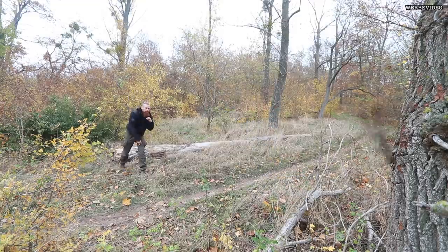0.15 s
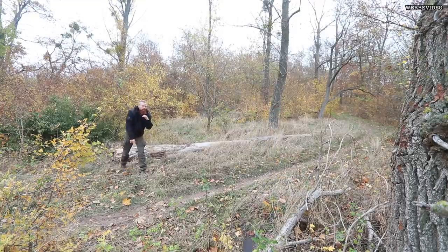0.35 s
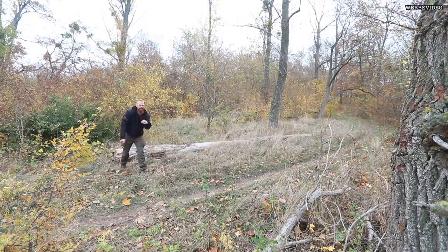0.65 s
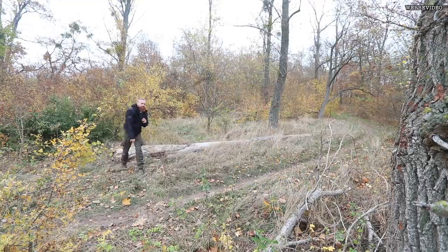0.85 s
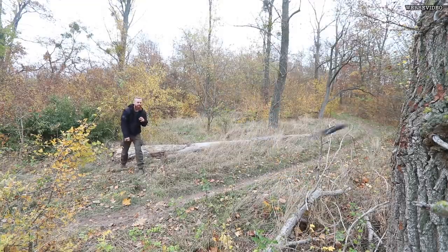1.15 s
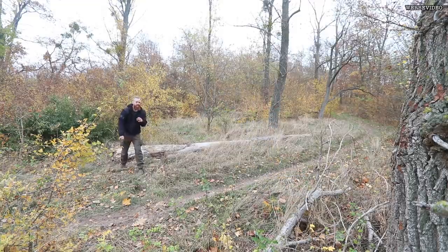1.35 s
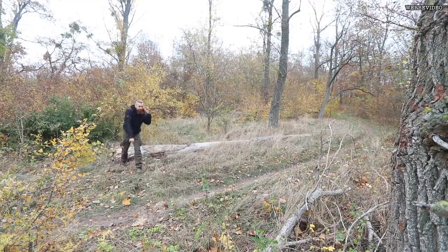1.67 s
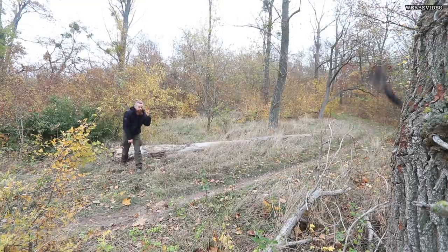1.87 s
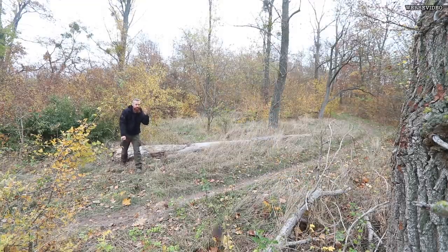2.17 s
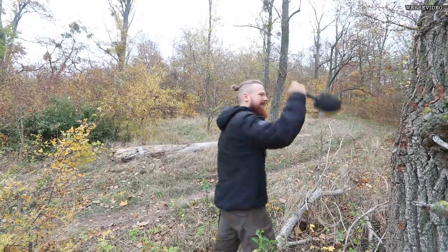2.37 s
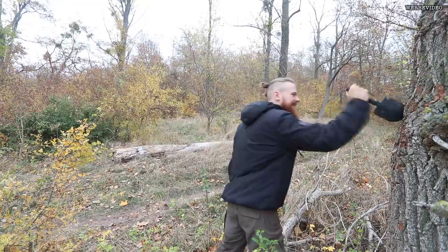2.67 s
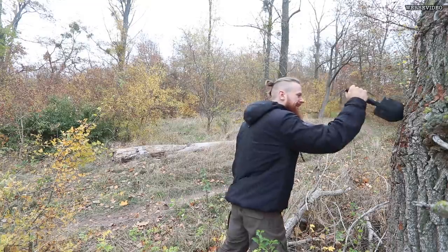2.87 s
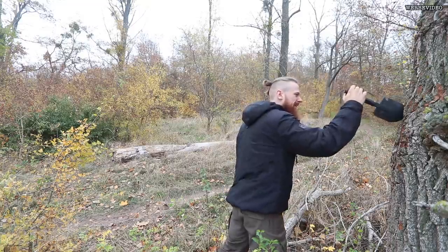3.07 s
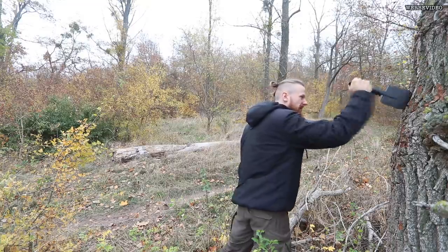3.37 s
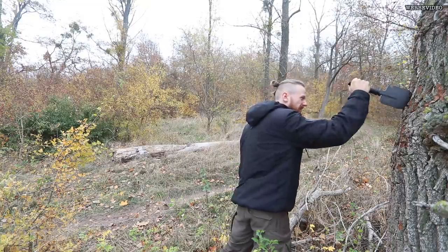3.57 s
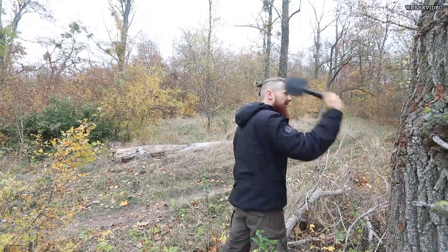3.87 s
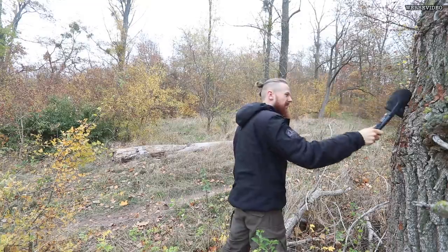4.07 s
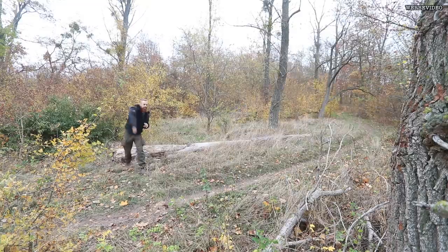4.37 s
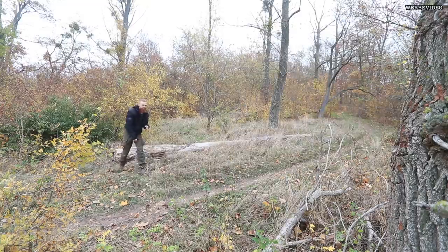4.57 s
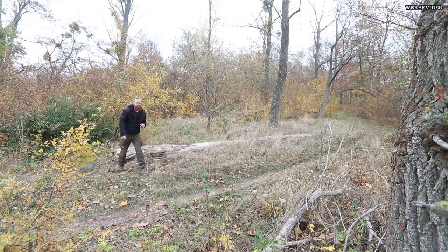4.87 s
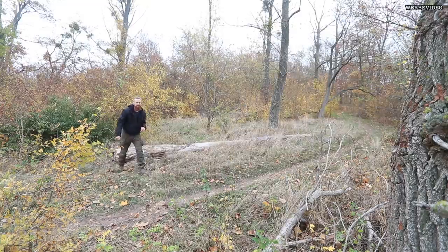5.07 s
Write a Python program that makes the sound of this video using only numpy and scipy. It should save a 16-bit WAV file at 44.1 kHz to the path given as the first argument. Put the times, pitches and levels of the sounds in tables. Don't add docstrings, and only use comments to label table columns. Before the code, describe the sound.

A quiet forest with a dull, faint hush and soft breeze, heard close to a tree in stereo. From the start, pulsing puffs of air with a thin whistle rush nearer, and at 0.2 s a steel shovel slams into the trunk: sharp crack, woody thud, rattling bounces, clear metallic ring and a diffuse echo. It drops into crunchy dry leaves around 0.55 s. A second whir ends in a heavier, thudding hit at 1.06 s, with tiny bark ticks near 1.4 s. A third, whistling throw strikes at 1.9 s and lands in leaves at 2.35 s. Hand-held chops follow at 2.73, 3.43 and 4.06 s, tighter, with short rattles and soft swings before them. Another fluttering, whistling throw hits hard at 4.67 s. A last knock at 5.02 s sets off a loud leaf burst and a small tumble. Takes cut abruptly; the strongest hits distort slightly.

```python
import sys
import numpy as np
from scipy import signal
from scipy.fft import rfft, irfft
from scipy.io import wavfile
from scipy.ndimage import uniform_filter1d

SR = 44100
rng = np.random.default_rng(int(sys.argv[2]) if len(sys.argv) > 2 else 0)


def transcribe(signal):
    frames = np.atleast_2d(signal).T
    limited = np.clip(frames, -1, 1)
    pcm = np.round(limited * 32767).astype(np.int16)
    wavfile.write(sys.argv[1], SR, pcm)


def to_linear_factor(level_db):
    exponent = np.asarray(level_db, float) / 20
    return 10 ** exponent


N = 230598


def evened(x):
    return x / np.sqrt(np.mean(x ** 2) + 1e-20)


def read(points, hz):
    f, value = np.transpose(points)
    return np.interp(np.log(hz + 1), np.log(f + 1), value)


def add(mix, s, sound):
    part = mix[..., round(s * SR):][..., :sound.shape[-1]]
    part += sound[..., :part.shape[-1]]


def pair(source, tone, same):
    hz = np.fft.rfftfreq(source.shape[-1], 1 / SR)
    a, b = rfft(source)
    likeness = np.clip(read(same, hz), 0, 1)
    shared = np.sqrt((1 + likeness) / 2) * a
    own = np.sqrt((1 - likeness) / 2) * b
    ports = np.array([shared + own, shared - own]) * to_linear_factor(read(tone, hz))
    return evened(irfft(ports, source.shape[-1]))


def noise(length):
    return rng.standard_normal((2, length))


# pitch_hz, likeness
SAME = [(60, 0.21), (180, 0.7), (550, 0.78), (1650, 0.28), (4970, 0.49), (15000, 0.09)]
# pitch_hz, level_db (per Hz)
QUIET = [(12, -49), (25, -6), (70, -4.5), (596, -3), (811, -1), (1250, -7.5), (4490, -22), (16300, -26.5)]


def hush():
    return to_linear_factor(-60.5) * pair(noise(N), QUIET, SAME) * to_linear_factor([[-1.1], [1.1]])


# pitch_hz, level_db
HISS = [(800, -32), (2000, -3), (4000, -2.5), (8000, -4), (12000, -11), (16400, -14.5)]


def breeze():
    return pair(noise(N), HISS, SAME)


# first_puff_s, nearest_puff_s, flutter_db, hiss_db
FLIGHTS = [
    (.004, 0.128, -47, -54),
    (0.839, 0.976, -49, -53),
    (1.536, 1.82, -49.5, -57),
    (4.399, 4.593, -47.5, -51),
]
# centre_s, flutter_db, hiss_db, length_s
SWINGS = [
    (2.481, -60, -60.5, 0.33),
    (2.711, -62, -58.5, .065),
    (3.396, -71, -62.5, 0.078),
    (4.045, -73, -63, 0.046),
    (5.013, -46, -75, 0.027),
]


def puffs():
    half_turn_s, puff_s = .068, .056
    rows = list(SWINGS)
    for first, near, flutter_db, hiss_db in FLIGHTS:
        turns = round((near - first) / half_turn_s)
        for k in range(turns + 1):
            rows.append((near - k * (near - first) / turns, flutter_db - 2.5 * k, hiss_db - 2 * k, puff_s))
        rows.append((near + .055, flutter_db + .5, hiss_db - 8.5, puff_s))
    return rows


def whir():
    low = [(60, -20.5), (200, -4.5), (450, 0.45), (850, -1.0), (1500, -5.5), (2500, -10.0), (5000, -36)]
    power = np.zeros((2, N))
    for s, flutter_db, hiss_db, length in puffs():
        start = max(s - 1.2 * length, 0)
        t = np.arange(start, s + 1.2 * length, 1 / SR)
        swell = np.exp(-8 * ((t - s) / length) ** 2)
        add(power, start, to_linear_factor([[2 * flutter_db], [2 * hiss_db]]) * swell)
    flutter, hiss = np.sqrt(power)
    return flutter * pair(noise(N), low, SAME) + hiss * pair(noise(N), HISS, SAME)


# time_s, pitch_hz, level_db
WHISTLES = [(0.117, 1974, -50), (0.154, 1880, -42), (.14, 833, -48.5), (1.583, 796, -55.5),
            (1.679, 865, -53.5), (1.693, 1930, -50), (1.769, 835, -52), (1.832, 1850, -45.5),
            (1.85, 833, -42.5), (4.469, 1925, -49), (4.53, 873, -51.5), (4.604, 1880, -52),
            (4.65, 890, -45)]


def whistles():
    out = np.zeros((2, N))
    for s, hz, db in WHISTLES:
        length = 58 / hz
        bump = np.hanning(round(0.9 * length * SR))
        wobble = uniform_filter1d(rng.standard_normal(8000), size=300)
        turns = np.cumsum(hz * (1 + 0.19 * wobble))[:len(bump)] / SR
        tone = bump[:len(turns)] * np.sin(2 * np.pi * turns)
        add(out, s - 0.35 * length, to_linear_factor(db) * tone[None])
    return out


def held(s):
    return 2.401 <= s < 4.389


RATTLE_T60 = 0.043
# time_s, bite_db, bite_hz, body_db, body_hz
STRIKES = [
    (0.2025, 7, 1241, 2.5, 431),
    (1.061, 7, 853, 8, 529.6),
    (1.9114, 6.5, 597, 1.5, 1049),
    (2.7341, -6.5, 1504, -5, 314.3),
    (3.4343, -0.5, 2597, -10.5, 492),
    (4.0596, -1, 1086, 1.5, 384.2),
    (4.6746, 7.5, 1117, 0.5, 611),
    (5.0193, 1, 1600, -10, 435),
]
# time_s, thud_db, thud_hz, crack_db
REBOUNDS = [(0.2088, -7.5, 1925, -3), (.218, -2.5, 801.4, -2.5), (0.2217, -10.5, 1394, -7.5),
            (1.0718, 1, 1906, -5), (1.073, 5.5, 458.2, -8), (1.0795, -7, 629, -18.5),
            (1.918, -5.5, 4958, -3), (1.9333, -9.5, 4900, -16), (1.953, 1, 399.8, -18),
            (1.957, -13.5, 4960, -12.5), (2.7429, -7, 289, -10), (2.742, -8, 2210, -49),
            (2.782, -27.5, 477, -39), (3.4325, -10, 597, -19.5), (3.452, -20, 360, -39.5),
            (4.062, -2, 847, -7.5), (4.071, -22.5, 444, -26.5), (4.122, -45, 1835, -39),
            (4.6837, -0.5, 885, -8), (4.736, -28, 877, -34), (5.021, 2.5, 2284, -8.5), (5.04, -4, 883, -13),
            (5.0748, -25, 710, -21.5)]
# time_s, thud_db, thud_hz, crack_db
LANDINGS = [
    (.524, -51, 2500, -44),
    (0.5347, -41.5, 1210, -36),
    (0.5571, -21.5, 1630, -22.5),
    (0.5641, -31.5, 407, -30),
    (0.5816, -31, 531, -16.5),
    (2.3296, -50.5, 1000, -30.5),
    (2.34, -19, 320, -24.5),
    (2.355, -20, 1594, -18.5),
    (5.1412, -50, 1420, -26.5),
]
# time_s, level_db, pitch_hz
BITS = [
    (0.726, -42, 4070),
    (1.361, -44.5, 8940),
    (1.39, -44.5, 8530),
    (1.4034, -36, 2030),
    (1.4305, -32, 6500),
    (2.277, -53, 7490),
    (2.283, -59.5, 6050),
    (2.3015, -49.5, 9010),
    (5.196, -47, 2424),
]


def touches():
    bite_t60, ground_t60, bit_t60 = 0.019, 0.032, .011
    rows = []
    for s, bite_db, bite_hz, body_db, body_hz in STRIKES:
        rows.append((s, bite_db, bite_hz, bite_db - 4.5, bite_t60))
        rows.append((s + .0035, body_db, body_hz, bite_db - 13.5, RATTLE_T60))
    rows += [(s, db - 6, hz, db, bit_t60) for s, db, hz in BITS]
    rows += [(*row, RATTLE_T60) for row in REBOUNDS]
    return rows + [(*row, ground_t60) for row in LANDINGS]


# pitch_hz, likeness
NEAR_SAME = [(500, .99), (2000, .97), (6000, .9), (15000, .84)]
# pitch_hz, level_db (per Hz)
CRACK = [(100, -41.5), (400, -12), (1000, 0), (2000, 3.5), (3800, -2.5), (8500, -3.5), (11000, -12),
         (16400, -12)]


def contacts():
    t, thuds, cracks, blows = np.arange(6000) / SR, np.zeros(N), np.zeros(N), np.zeros(N)
    for s, thud_db, hz, crack_db, crack_t60 in touches():
        thud_t60 = 0.018 * (1000 / hz) ** 0.8
        if held(s) and crack_t60 == RATTLE_T60:
            crack_db, crack_t60 = crack_db - 4, crack_t60 * 0.58
        turns = hz * t + .4 * (1 - np.exp(-t * hz / 0.5))
        wood = np.sin(2 * np.pi * turns) + to_linear_factor(-3 - 980 * t) * np.sin(2 * np.pi * .57 * turns)
        swell = 1 - np.exp(-(t * hz / 0.48) ** 2)
        push = to_linear_factor(thud_db + 1.5 - 60 * t / thud_t60) * swell
        snap = to_linear_factor(crack_db - 60 * t / crack_t60) * (1 - np.exp(-t / 0.00018))
        add(thuds, s, -push * wood)
        add(cracks, s, snap)
        blows[round(s * SR)] = np.linalg.norm(0.83 * push + snap)
    lumps = to_linear_factor(3.0 * evened(uniform_filter1d(rng.standard_normal(N), size=40)))
    return thuds + cracks * pair(lumps * noise(N), CRACK, NEAR_SAME), blows


# start_s, bending_db, middle_db, edge_db, t60_factor
RINGS = [(.216, -16, -60, -60, .45), (.216, -33, -34, -60, 2.1), (.21, -50, -30, -6, .3),
         (.223, -50, -10, -14, .8), (.583, -25, -27, -34, .25), (1.071, -30, -24, -12, .6),
         (1.08, -36, -26, -14, .6), (1.92, -23, -14, -20, .8), (1.957, -36, -21, -20, .6),
         (2.357, -34, -46, -46, .2), (2.743, -44, -40, -20, .5), (3.436, -55, -44, -24, 1.6),
         (4.068, -21, -30, -21, .25), (4.68, -26, -20, -22, .4), (4.693, -22, -30, -26, .25),
         (5.022, -16, -28, -26, .15), (5.142, -48, -50, -50, 1.1)]
# pitch_hz, level_db, t60_s, family (0 bending, 1 middle, 2 edge)
BLADE = [(1744, 0, .36, 0), (1725.5, -1.5, .36, 0), (5430, 0, .17, 1), (5378, -3, .15, 1),
         (7780, 0, .09, 2), (2320, -12, .1, 0), (3494, -22, .3, 0), (3950, -14, .2, 1), (4510, -22, .12, 1),
         (7290, -10, .1, 2), (8200, -7, .08, 2), (8390, -8, .08, 2), (9570, -10, .12, 2),
         (10050, -14, .12, 2)]


def blade():
    t, out = np.arange(SR // 2) / SR, np.zeros((2, N))
    hz, db, t60, family = np.transpose(BLADE)[:, :, None]
    port_lag = np.array([-1, 1])[:, None, None] * hz * 7e-6
    modes = np.sin(2 * np.pi * (hz * t + port_lag)) * (1 - np.exp(-t / 0.00045))
    for s, *family_db, damping in RINGS:
        chance_db = 0.52 * rng.standard_normal((len(BLADE), 1)) * (db < -5)
        start_db = np.array(family_db)[family.astype(int)] + db + chance_db
        mode_t60 = t60 * np.where(family > 1.5, 0.39, damping)
        add(out, s, (to_linear_factor(start_db - 60 * t / mode_t60) * modes).sum(1))
    return out


# pitch_hz, t60_s
FOREST = [(100, 2.4), (400, 1.25), (1000, 0.86), (2300, 2), (3500, 0.95), (6000, .8), (9000, 0.55),
          (15000, .35)]
# pitch_hz, level_db
FOREST_TONE = [(100, -20), (300, 0), (500, 5), (1000, 1.7), (2400, -6.5), (3300, -8), (7000, -6),
               (15000, -15.5)]


def forest(tilt_db):
    hz, t, z = signal.stft(pair(noise(SR), FOREST_TONE, SAME), SR, nperseg=256)
    trunks_db = 1.8 * rng.standard_normal(len(t))
    early_db = 10 * np.log10(1 + 40 * np.exp(-t / 0.024))
    tone_db = tilt_db * np.log2((hz[:, None] + 100) / 1000)
    decay_db = 60 * t / read(FOREST, hz)[:, None]
    tail = signal.istft(z * to_linear_factor(trunks_db + early_db + tone_db - decay_db), SR, nperseg=256)[1]
    tail = tail * np.clip(np.arange(tail.shape[1]) / (0.0072 * SR), 0, 1)
    return tail / np.linalg.norm(tail[0])


# pitch_hz, level_db (per Hz)
BOOM = [(20, -20), (40, -3), (75, -14), (125, 0), (175, -22), (400, -70)]


def boom():
    t = np.arange(SR) / SR
    return pair(noise(SR), BOOM, SAME) * to_linear_factor(-60 * t / 1.2) * (1 - np.exp(-t / 0.014))


def rustle_gain(rows):
    t, out = np.arange(N) / SR, np.zeros(N)
    for start, top, db in rows:
        climb = to_linear_factor(-12.5 * np.clip((top - t) / (top - start), 0, 1))
        after = np.maximum(t - top, 0)
        fall = np.maximum(to_linear_factor(-1100 * after), to_linear_factor(-20 - 130.5 * after))
        rise = np.clip((t - start) / min(0.0084, top - start), 0, 1) ** 2
        out += to_linear_factor(db) * rise * climb * fall
    return out


# start_s, loudest_s, level_db
LEAVES = [
    (.515, .583, -27.5),
    (1.35, 1.432, -56.5),
    (2.27, 2.32, -53.5),
    (2.322, 2.359, -28.5),
    (5.048, 5.052, -17.5),
    (5.132, 5.142, -25.5),
]


def leaves():
    size = to_linear_factor(3.7 * np.minimum(rng.exponential(1, (2, N)), 5))
    snaps = size * (rng.random((2, N)) < 3500 / SR)
    snaps = snaps * noise(N) + 0.27 * noise(N)
    tone = [(100, -16), (300, 3.5), (1500, -3.5), (4000, 1), (9000, -2.0), (13000, -6.5), (16400, -13.5)]
    return to_linear_factor(-2.0) * rustle_gain(LEAVES) * pair(snaps, tone, NEAR_SAME)


# start_s, left_right_db, boom_db, breeze_db
TAKES = [
    (0, -0.8, -46, -62.5),
    (.81, -2.5, -54.5, -67),
    (1.442, -3.5, -45.5, -64),
    (2.403, -3, -59.5, -72),
    (3.099, -3.5, -66, -71.5),
    (3.8, -4, -56, -73),
    (4.389, -3.5, -44, -67.5),
    (4.991, 2, -51.5, -76),
]
# wash_db, tilt_db_per_octave
WASHES = [
    (-22, 1.5),
    (-20.5, 0.7),
    (-21, 1.17),
    (-26.5, -1.1),
    (-23, 2),
    (-24.5, -1),
    (-23, 0.36),
    (-21, 3),
]


def scene():
    knocks, force = contacts()
    steel = blade()
    spread = force + 0.44 * steel.mean(0) + 0.28 * knocks.mean(0)
    air = breeze()
    t, out = np.arange(N) / SR, np.zeros((2, N))
    ends = [row[0] for row in TAKES[1:]] + [N / SR + 1]
    for (s, pan_db, boom_db, breeze_db), (wash_db, tilt_db), end in zip(TAKES, WASHES, ends):
        span = slice(round(s * SR), round(end * SR) + 800)
        part = (knocks + steel)[:, span] * to_linear_factor([[pan_db / 2], [-pan_db / 2]])
        part += to_linear_factor(breeze_db) * air[:, span]
        wash = signal.fftconvolve(spread[None, span], forest(tilt_db), axes=1)
        part += to_linear_factor(wash_db) * wash[:, :part.shape[1]]
        add(part, np.argmax(force[span]) / SR, to_linear_factor(boom_db) * boom())
        add(out, s, part * np.clip((end + 0.0093 - t[span]) / 0.024, 0, 1))
    return out + hush() + whir() + whistles() + leaves()


def roll_off(x):
    return signal.sosfilt(signal.butter(12, 16460, fs=SR, output="sos"), x)


# start_s, end_s, first_top_hz, last_top_hz
THINNED = [
    (.235, 0.298, 14500, 15770),
    (0.519, 0.812, 15600, 11700),
    (1.094, 1.28, 14030, 13210),
    (1.939, 2.11, 14040, 15700),
    (5.064, 5.3, 12250, 12300),
]


def record(dry):
    capsule = signal.sosfilt(signal.butter(2, 60, "high", fs=SR, output="sos"), dry)
    clipped = np.clip(capsule, -.97, .97)
    loud = signal.sosfilt(signal.butter(1, 50, "high", fs=SR, output="sos"), clipped)
    hz, t, z = signal.stft(loud, SR, nperseg=256)
    top_hz = np.full(len(t), 16000.0)
    for start, end, *edge_hz in THINNED:
        top_hz = np.where((t > start) & (t < end), np.interp(t, [start, end], edge_hz), top_hz)
    kept = np.clip((top_hz - hz[:, None]) / 400, .01, 1)
    mix = signal.istft(z * kept, SR, nperseg=256)[1][:, :N]
    return roll_off(mix)


dry = scene()
out = record(dry)
transcribe(out)
```